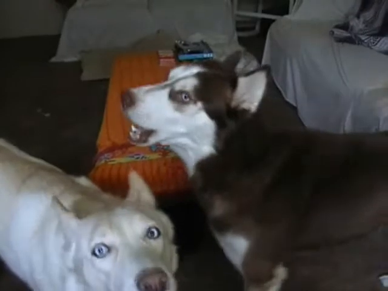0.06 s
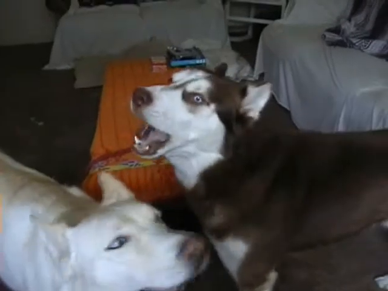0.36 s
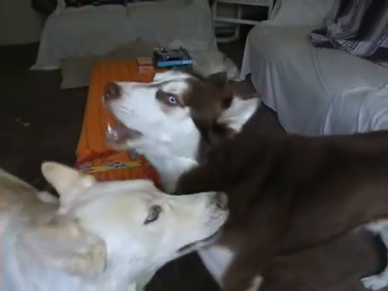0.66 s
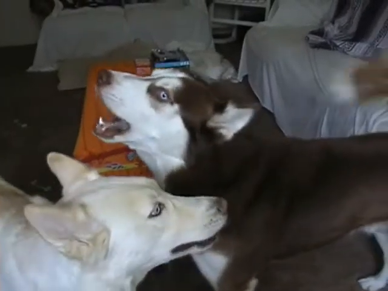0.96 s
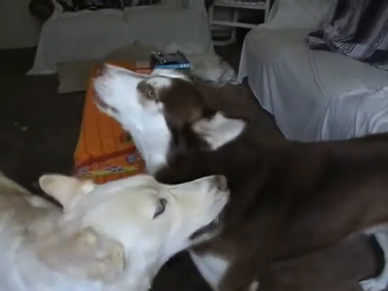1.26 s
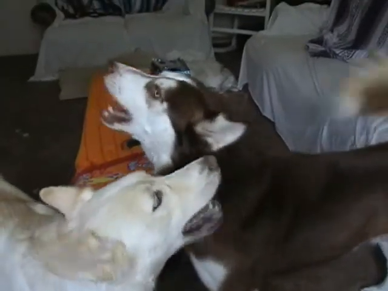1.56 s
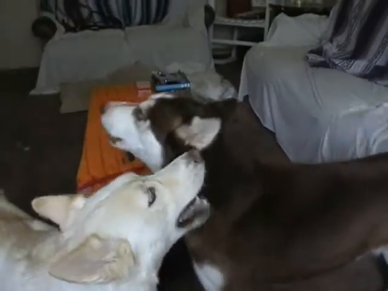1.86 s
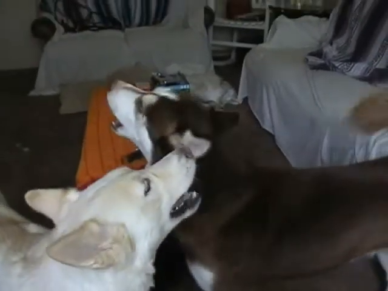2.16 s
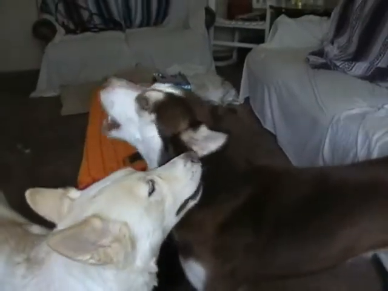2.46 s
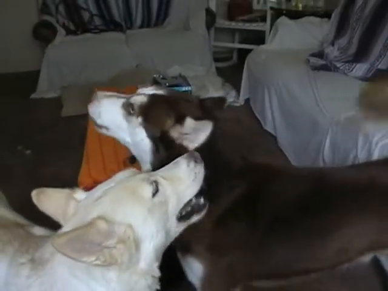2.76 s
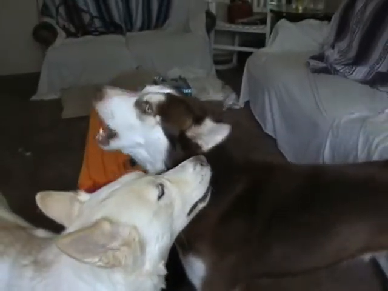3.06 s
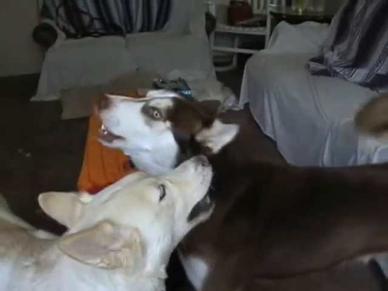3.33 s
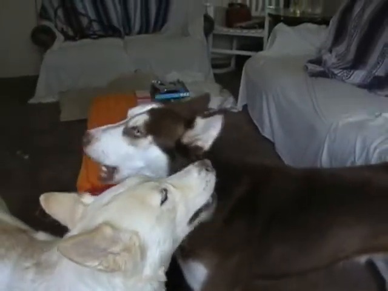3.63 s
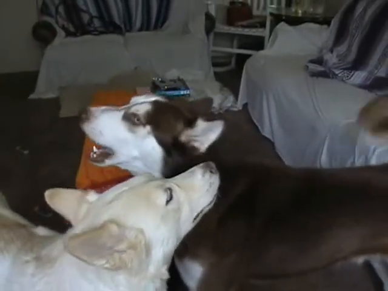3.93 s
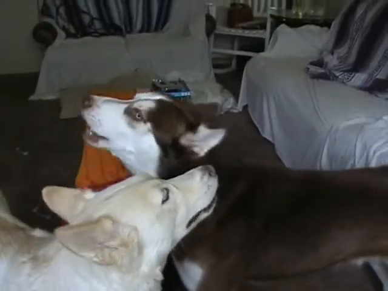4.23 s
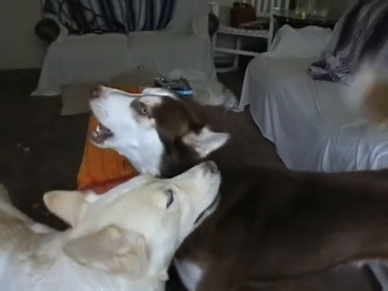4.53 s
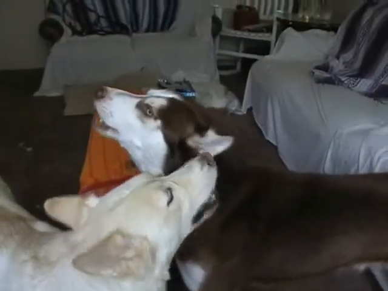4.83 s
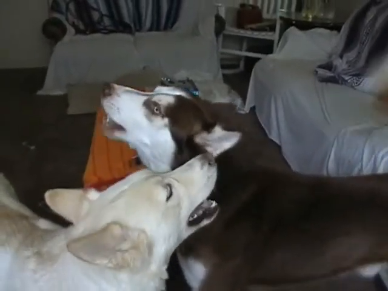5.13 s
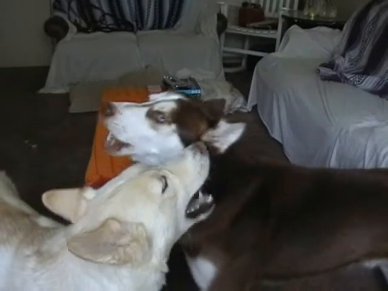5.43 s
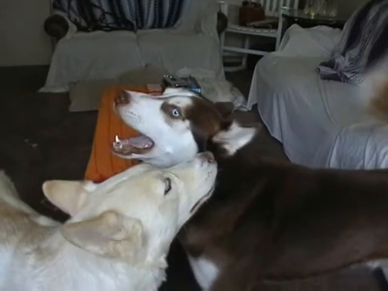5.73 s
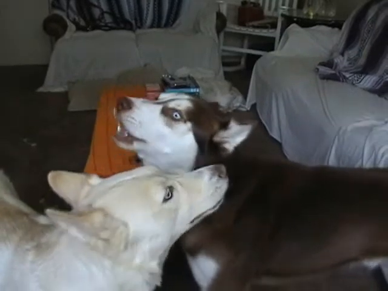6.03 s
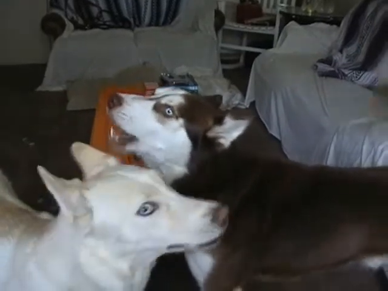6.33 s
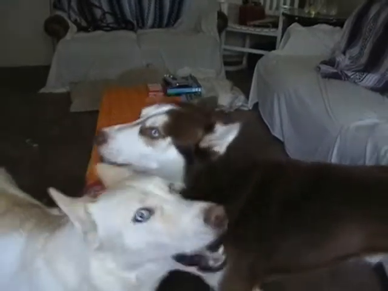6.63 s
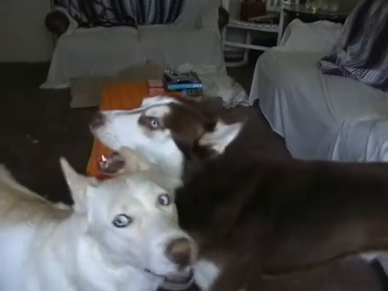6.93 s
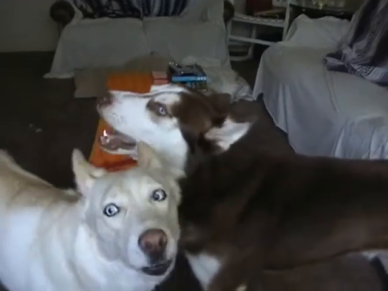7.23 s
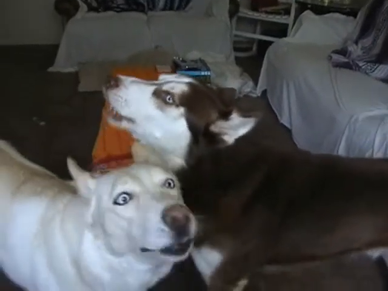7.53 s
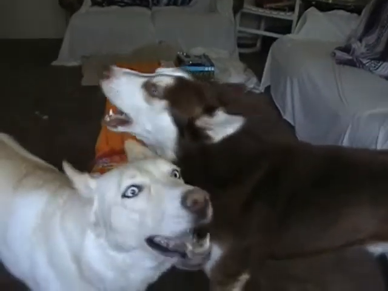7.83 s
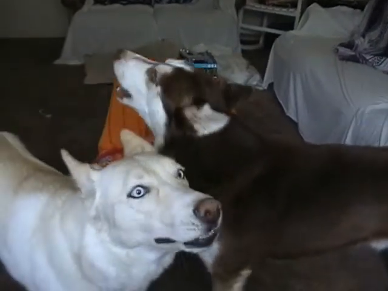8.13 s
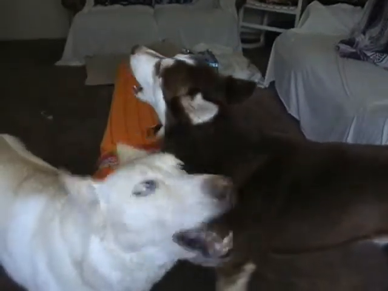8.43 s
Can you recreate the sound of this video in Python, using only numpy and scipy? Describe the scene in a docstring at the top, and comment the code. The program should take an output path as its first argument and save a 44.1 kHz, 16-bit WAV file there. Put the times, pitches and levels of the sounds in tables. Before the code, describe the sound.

One dog holds long, high, wavering howls while another answers with short, rough yowls, close up indoors.

```python
"""Two huskies sing together, close by, in a furnished living room that trails every glide.
From the start, one holds long, clean, flute-like howls; the other answers with lower swooping yowls,
harsh at their loudest. Each voice is a stack of vocal-fold partials shaped by throat and mouth.
At 0.7 s the sound cuts out for an instant. From 1.5 s hoarse gasps fall between calls;
soft bumps join after 3 s, light clicks after 5 s. Both dogs sing on to the end."""
import sys
import numpy as np
from scipy import signal
from scipy.fft import rfft, irfft, next_fast_len
from scipy.io import wavfile
from scipy.ndimage import uniform_filter1d

SR = 44100
rng = np.random.default_rng(int(sys.argv[2]) if len(sys.argv) > 2 else 0)


def pcm_store(signal):
    """Save signal as 16-bit PCM."""
    levels = np.round(np.clip(np.atleast_2d(signal), -1, 1) * 32767)
    wavfile.write(sys.argv[1], SR, levels.astype(np.int16).T)


N = 382788

# Howl curves; the first howl jumps in pitch at the dropout, other steps are register breaks.
# Each row: time in seconds, pitch in Hz, relative level in dB, brightness in dB, mouth resonance in Hz.
HOWL_CURVES = [
    [(0, 919.4, -12, 9, 1550), (0.098, 897.3, -46, 24, 1800), (0.135, 869, -27, -4, 1740),
     (0.186, 866, -24.5, -1, 2480), (0.259, 938, -15, 4, 2760), (0.331, 898, -16.5, -8.5, 2370),
     (0.403, 954, -16, 9, 2560), (0.418, 1054, -16.5, -13, 3100), (0.555, 988, -18, 1, 2870),
     (0.715, 950, -9, -5, 2720)],
    [(0.71, 1100, -16.5, 10.5, 3050), (0.807, 1108, -10, 3, 2790), (0.956, 1029, -16, -1.5, 2170),
     (1.085, 1115, -13, 1, 2454), (1.262, 1025, -21, -4.5, 2120), (1.332, 731, -27, 6, 2050)],
    [(1.637, 615, -19.5, 6.5, 1930), (1.662, 675, -20.5, -5.5, 2030), (1.766, 665, -21.5, -4.5, 1800),
     (1.823, 687.4, -9, -10, 2720), (1.834, 925, -24.5, 1, 2820), (1.873, 953, -22.5, 14, 2550),
     (1.958, 852.6, -27, 2, 2815), (2.113, 933.4, -14.5, 4.5, 2360), (2.125, 1057, -20.5, 8.5, 2720),
     (2.29, 1058, -20.5, -3, 2445), (2.536, 982.5, -19.5, -13, 2644), (2.659, 968.5, -18.5, -1, 1680),
     (2.731, 713, -27.5, 6.5, 1742)],
    [(3.066, 537, -30.5, 12.5, 3140), (3.161, 703, -4, -21.5, 3280), (3.172, 858.7, -20, -0.5, 1760),
     (3.319, 901, -18.5, -2, 2595), (3.485, 868, -17.5, -10.5, 2380), (3.577, 947, -16.5, -3.5, 2750),
     (3.748, 1002, -23, 8.5, 3040), (3.769, 1056, -27.5, -0.5, 2130), (3.952, 1055, -19, 1.5, 2980),
     (4.043, 1126, -17, 3, 2262), (4.257, 1106, -18.5, 6.5, 2330), (4.354, 1040, -12.5, -11, 2793),
     (4.489, 1013, -23, -8, 3000)],
    [(4.49, 877, -23, 8, 1680), (4.545, 980, -23, -0.5, 2195), (4.657, 1127, -14.5, 8, 2366),
     (4.854, 1114, -24, 7, 2335), (4.917, 1015, -22, -9, 3100), (4.932, 818, -21.0, -14, 3050),
     (5.021, 773, -31, -24, 2920)],
    [(5.222, 578.5, -26, -0.5, 1990), (5.265, 637, -14.5, -4.5, 1980), (5.309, 754, -7.5, -2, 2570),
     (5.319, 763, -32, -1.5, 3080), (5.352, 767, -2, -19, 3000), (5.363, 870, -23.0, -17.5, 3200),
     (5.461, 993, -18, -6, 1860), (5.54, 983, -19.5, 4.5, 3050), (5.557, 859, -20, -10, 2394),
     (5.635, 899.4, -19.5, -2, 2770), (5.765, 1085, -10.5, -7, 3120), (5.92, 1116, -14, 2, 2660),
     (6.036, 1067, -19.5, 10.5, 2350), (6.09, 986, -16, -15, 2350), (6.164, 745, -22, -18.5, 2626)],
    [(6.582, 564, -25, -6, 3140), (6.645, 799.6, -9, 0.5, 3090), (6.712, 849.4, -23, 3, 3100),
     (6.804, 809, -28, -1, 2860), (6.875, 900, -16.0, 0, 2590), (6.946, 861.7, -17.5, -5.5, 2280),
     (7.05, 993.7, -15.5, -16, 2670), (7.254, 1028, -22, 10, 3090), (7.34, 1002, -12, -7, 2730),
     (7.352, 1074, -16.0, 8.5, 2530), (7.457, 1032, -20, 0.5, 2450), (7.542, 817.5, -20, 2, 1650)],
    [(7.765, 501.4, -22, -14, 2610), (7.84, 702, -18, 6, 2590), (7.928, 807, -19.5, -11.5, 1880),
     (7.979, 923, -19.5, 0, 2080), (8.045, 967, -18, -1.5, 1940), (8.221, 924.8, -17, -10.5, 2990),
     (8.316, 903.8, -17, 5.5, 2230), (8.466, 870, -22, 1, 2200), (8.693, 958, -22, 4.5, 2680)],
]
# Yowls. Each row: start, rise, hold and tail in seconds, start, top and end pitch in Hz,
# relative onset, main and tail level in dB, brightness in dB, open mouth resonance in Hz,
# share of the climb done at half time, lip rounding from 0 to 1.
YOWL_SWOOPS = [(0,.039,.07,.175,719,910,640.3,-21,-22.5,-12,6.5,1800,.8,0.07),(0.322,0.084,.06,.22,623.4,885,468,-36,-25.5,-37,-0.5,1677,.45,0),
               (1.199,.075,.075,.11,480.3,785,622,-31,-19,-33,-9.5,2250,0.73,.3),(1.498,0.089,.054,.16,608,890,620,-32,-19.5,-34.5,1.5,1608,.5,.5),
               (1.81,0.085,.055,.12,584.4,846,574,-39,-20,-35,-8,2700,0.51,.9),(2.151,0.079,.076,.46,559.5,728,532.6,-35,-26,-31.5,-2,1727,0.76,.8),
               (2.759,.12,.015,.268,547,755.6,483,-29,-18,-24,-15,2080,.6,.85),(3.362,.07,.046,.189,436,755.5,449,-28.5,-23,-38.5,-5.5,2405,.75,.2),
               (3.697,0.072,.061,.13,482.6,817,633,-44,-19.5,-40,-7.5,2820,.75,1),(4.384,.086,.016,0.017,500,802.6,638,-28,-15.5,-40.5,-10.5,2080,0.67,.95),
               (4.75,0.064,.12,.145,585,918.4,660,-35,-25,-33,-5,1767,0.54,0.11),(5.084,0.063,.045,.08,690,839.4,760,-31.5,-22.5,-24.5,-4.5,1683,.5,1),
               (5.421,.075,.071,.18,591,906,556,-34,-28,-37.5,2.5,2080,.5,.7),(5.879,.05,.11,.02,491.4,561,400,-37,-35.5,-50,-8.5,2250,.75,0),
               (6.385,.086,.026,.031,455,702,337.5,-23,-16,-26.5,-2.5,2115,.6,.6),(6.567,0.082,.047,.066,371.5,628,591,-28,-32,-32,3.5,1940,.35,0),
               (6.778,0.061,.016,.16,578,889,521,-42,-24.5,-40,0,1304,.32,.05),(6.989,0.087,.062,.216,531,858,638,-34.5,-24.5,-42,5,1794,.55,.3),
               (7.376,0.075,.066,.029,565,882,740,-43,-25,-28,8,1590,0.64,0.92),(7.744,0.09,.06,.016,603,895,676,-30,-21.5,-24.5,0,1440,.33,.5),
               (8.408,.11,.109,.015,480,917.4,650,-38,-22.5,-46,-1,1440,0.51,0.1)]
# Throat and muzzle colour. Each row: frequency in Hz, relative gain in dB.
HOWL_TRACT = [(450, 38.5), (700, 33.5), (1100, 37.5), (1400, 8.5), (1750, 21.5), (2000, 21.5), (2250, 21),
              (2600, 22.5), (3300, -2), (3900, 3.5), (4650, -13), (5300, 6.5), (6000, -14.5), (6400, -6.5),
              (7300, -7.5), (8100, -6.5), (9300, -20), (11000, -33), (13000, -59.5)]
YOWL_TRACT = [(400, 36), (550, 29), (800, 30.5), (1100, 33.5), (1400, 22.5), (1750, 23), (2000, 22.5),
              (2600, 21.5), (3400, 5.0), (3750, -0.5), (4700, -16), (5350, -3), (5700, -8.5), (6200, 5),
              (7500, -4.0), (8600, -1), (10000, -13.5), (13000, -36), (15500, -50)]
# Noise bursts. Each row: centre in seconds, relative level in dB, half length in seconds.
RASP_BURSTS = [(.07, -43.5, 0.067), (.425, -31, 0.034), (1.27, -32.5, 0.019), (1.597, -37, 0.026),
               (3.14, -36.5, 0.039), (4.45, -42.5, 0.074), (4.828, -35, 0.022), (5.29, -41, 0.054),
               (6.44, -66, 0.019), (6.66, -38.5, .045), (7.097, -24, 0.03), (7.472, -30, 0.043),
               (7.848, -34.5, 0.049), (8.477, -23, 0.035)]
GASP_BURSTS = [(1.49, -34, 0.039), (3.0, -42, 0.044), (5.01, -40.5, 0.022), (5.15, -33.5, 0.044),
               (6.31, -34.5, 0.093), (7.68, -37, .05)]
CLICK_BURSTS = [(5.035, -49.5, 0.0034), (5.08, -42, 0.0021), (5.782, -43.5, .002), (6.28, -58, .002),
                (7.66, -52, 0.0021)]
BUMP_BURSTS = [(3.16, -56, 0.025), (5.37, -45, 0.022), (5.77, -42, 0.043), (7.125, -45, 0.014)]
# Noise colours. Each row: frequency in Hz, relative density in dB.
RASP_SPECTRUM = [(40, -10.5), (170, 4), (330, -1.5), (1200, -9), (4000, -4), (8500, -14.5), (15500, -32.5)]
GASP_SPECTRUM = [(100, -17.5), (250, -4.5), (520, 1), (900, 0.5), (1300, -3), (2600, -19), (5000, -36.5),
                 (9000, -50.5), (13000, -50)]
CLICK_SPECTRUM = [(300, -15.5), (2000, -9), (5500, 1.5), (9000, 5.5), (14000, -16.5)]
BUMP_SPECTRUM = [(30, -16), (110, 4.5), (200, -8), (700, -8), (4000, -45)]
HUSH_SPECTRUM = [(25, -20), (130, -8.5), (350, -10), (1000, -9.5), (3500, -18.5), (8500, -27.5),
                 (11000, -40.5)]
# Room decay. Each row: frequency in Hz, time to fall 60 dB in seconds.
ROOM_T60 = [(300, 0.54), (900, 0.43), (2500, 0.42), (9000, 0.39)]

DROPOUT_START_S, DROPOUT_END_S = 0.708, 0.748
BAND_EDGE_HZ = 15800


def howling_dog():
    """Even vocal-fold cycles give long, clean tones."""
    return voice(HOWL_CURVES, HOWL_TRACT, coarse=np.zeros(N), jitter=0.003, shimmer=0.099, drift_hz=55,
                 flutter_db=6.5, flutter_hz=32, attack_s=0.0037, thin_db=-3, push_db=-0.5)


def yowling_dog():
    """Lower swoops; the sound turns coarse and distorted at each rasp."""
    curves = [swoop(*row) for row in YOWL_SWOOPS]
    return voice(curves, YOWL_TRACT, coarse=22 * swells(RASP_BURSTS), jitter=0.0029, shimmer=0.22,
                 drift_hz=83.5, flutter_db=8, flutter_hz=44.46, attack_s=0.012, thin_db=-4, push_db=3.5)


def swoop(start_s, rise_s, hold_s, tail_s, start_hz, top_hz, end_hz, onset_db, level_db, tail_db,
          bright_db, mouth_hz, half_risen, rounding, break_s=0.042):
    """One yowl curve: climbs as the mouth opens, holds as the lips round, breaks, sags as it closes."""
    moan_s = start_s + rise_s + hold_s + break_s
    moan_hz = 0.8 * top_hz  # about a major third down
    rounded_hz = mouth_hz + rounding * (top_hz - mouth_hz)
    dull = (bright_db - 8, 0.69 * mouth_hz)
    return [(start_s, start_hz, onset_db, bright_db - 9, 0.67 * mouth_hz),
            (start_s + rise_s / 2, start_hz + half_risen * (top_hz - start_hz),
             level_db, bright_db, mouth_hz),
            (start_s + rise_s, 0.98 * top_hz, level_db, bright_db, mouth_hz),
            (start_s + rise_s + hold_s, top_hz, level_db, bright_db - 7.5, rounded_hz),
            (moan_s, moan_hz, tail_db, *dull),
            (moan_s + tail_s / 2, moan_hz + 0.7 * (end_hz - moan_hz), tail_db, *dull),
            (moan_s + tail_s, end_hz, tail_db - 9.5, *dull)]


def voice(curves, tract, coarse, jitter, shimmer, drift_hz, flutter_db, flutter_hz, attack_s,
          thin_db, push_db, mouth_db=12.5, mouth_width_hz=148, full_climb_per_s=4.3, release_s=0.0021):
    """Vocal-fold partials on one unsteady pitch slide through the throat and mouth resonances."""
    out = np.zeros(N)
    peak_db = max(db for _, db in tract)
    for rows in curves:
        times_s, *columns = np.transpose(rows)
        t = np.arange(times_s[0], times_s[-1], 1 / SR)
        pitch_hz, level_db, bright_db, mouth_hz = (
            uniform_filter1d(np.interp(t, times_s, column), 300, mode="nearest") for column in columns)
        phase = 2 * np.pi * np.cumsum(pitch_hz * (1 + jitter * wander(len(t), drift_hz))) / SR
        knots_s = np.arange(times_s[0], times_s[-1] + 1, 1 / flutter_hz)
        # A climbing voice is pressed: the fundamental thins against the second partial.
        climb_per_s = uniform_filter1d(np.gradient(np.log(pitch_hz)), 900) * SR
        pressed = np.clip(climb_per_s / full_climb_per_s, 0, 1)
        partials = []
        for k in range(1, 22):
            hz = k * pitch_hz
            db = level_db + at_hz(tract, hz) - peak_db
            db += bright_db * min((k - 1) / 3.5, 1)
            db += mouth_db / (1 + ((hz - mouth_hz) / mouth_width_hz) ** 2)
            db += pressed * (thin_db * (k == 1) + push_db * (k == 2))
            db += flutter_db * (1 - 1 / k) * np.interp(t, knots_s, rng.standard_normal(len(knots_s)))
            wave = np.sin(k * phase + 2 * np.pi * rng.random())
            partials.append(gain(db) * (hz < BAND_EDGE_HZ) * wave)
        # Alternating strong and weak cycles put coarse lines halfway between the upper partials.
        alternation = np.cos(phase / 2) + 0.5 * wander(len(t), 200)
        uneven = np.interp(t * SR, np.arange(N), coarse) * alternation
        tone = partials[0] + (1 + uneven) * sum(partials[1:])
        fade = np.clip(np.minimum((t - t[0]) / attack_s, (t[-1] - t) / release_s), 0, 1)
        add(out, times_s[0], np.sqrt(2) * tone * fade * (1 + shimmer * wander(len(t), drift_hz)))
    return out


def rasp(yowl, depth=0.15, grain_db=4):
    """Gritty bursts on the loudest swoops, chopped by the cycles of the voice."""
    cycle = np.cos(np.angle(signal.hilbert(yowl, next_fast_len(N))[:N]))
    chopped = noise(RASP_SPECTRUM) * (1 + depth * cycle)
    return swells(RASP_BURSTS) * unit_rms(chopped * gain(grain_db * wander(N, 200)))


def gasps(grain_db=4):
    """Air rattles through a dog's throat between calls."""
    return swells(GASP_BURSTS) * unit_rms(noise(GASP_SPECTRUM) * gain(grain_db * wander(N, 120)))


def clicks():
    """Light clicks, perhaps of claws or teeth."""
    return swells(CLICK_BURSTS) * noise(CLICK_SPECTRUM)


def bumps():
    """Soft, low bumps."""
    return swells(BUMP_BURSTS) * noise(BUMP_SPECTRUM)


def room(x, first_s=0.006):
    """Dense reflections of random sign, each band dying at its own rate."""
    taps = rng.standard_normal(SR) * (rng.random(SR) < 0.1) * (np.arange(SR) > first_s * SR)
    hz, t, bands = signal.stft(taps, SR, nperseg=256)
    decay = gain(-60 * t / at_hz(ROOM_T60, hz)[:, None])
    _, tail = signal.istft(bands * decay, SR, nperseg=256)
    tail /= np.linalg.norm(tail)
    # The sound skips ahead at the dropout; no tail carries across.
    early = np.arange(N) < DROPOUT_END_S * SR
    return sum(part * signal.fftconvolve(x * part, tail)[:N] for part in (early, ~early))


def hush(level_db=-51):
    """Still-room noise, mostly shared by both channels."""
    shared, left, right = (noise(HUSH_SPECTRUM) for _ in range(3))
    return gain(level_db) * (shared + 0.43 * np.array([left, right]))


def ports(mid, lateral, corner_hz=4500):
    """Two close microphone ports: sound from the sides differs between them, more so in the treble."""
    hz = np.fft.rfftfreq(N, 1 / SR)
    side = irfft(rfft(lateral) * (hz + 250) / np.hypot(hz, corner_hz), N)
    return np.array([mid + side, mid - side])


def swells(bursts):
    """One Gaussian rise and fall per row."""
    t = np.arange(N) / SR
    return sum(gain(db) * np.exp(-((t - centre_s) / half_s) ** 2) for centre_s, db, half_s in bursts)


def noise(spectrum):
    """Steady coloured noise, rms 1."""
    colour = gain(at_hz(spectrum, np.fft.rfftfreq(N, 1 / SR)))
    return unit_rms(irfft(rfft(rng.standard_normal(N)) * colour, N))


def wander(size, corner_hz):
    """Low-passed random drift, rms 1."""
    padded = next_fast_len(size)
    hz = np.fft.rfftfreq(padded, 1 / SR)
    spectrum = rfft(rng.standard_normal(padded)) / (1 + (hz / corner_hz) ** 4)
    return unit_rms(irfft(spectrum, padded)[:size])


def at_hz(table, hz):
    """Table lookup on a log-frequency axis."""
    table_hz, values = np.transpose(table)
    return np.interp(np.log(hz + 1), np.log(table_hz), values)


def add(mix, start_s, sound):
    """Mixes a sound in, in place."""
    part = mix[max(round(start_s * SR), 0):][:len(sound)]
    part += sound[:len(part)]


def gain(db):
    """Decibels to amplitude."""
    return 10 ** (np.asarray(db) / 20)


def unit_rms(x):
    """Scales to rms 1."""
    return x / np.sqrt(np.mean(x ** 2) + 1e-20)


def scene():
    """Both dogs, their small noises, the room's reflections and its hush, in stereo."""
    howl = howling_dog()
    yowl = yowling_dog()
    grit = rasp(yowl)
    small_noises = gasps() + clicks()
    direct = gain(3.49) * howl + gain(5) * yowl + grit + small_noises
    to_walls = gain(-3) * howl + gain(-1.5) * (yowl + small_noises) + gain(-23.5) * grit
    mid = direct + room(to_walls) + bumps()
    lateral = room(gain(-2.5) * howl + gain(-1) * yowl) + gain(-6.5) * rasp(yowl)
    return ports(mid, lateral) + hush()


def record(dry, limit_db=-12, recovery_db_per_s=220, dropout_db=-49.5):
    """Limiter on the loudest tones, one dropout, then the band limit."""
    t = np.arange(N) / SR
    power_db = 10 * np.log10(abs(uniform_filter1d((dry ** 2).mean(0), 400)) + 1e-12)
    recovery_db = recovery_db_per_s * t
    held_db = np.maximum.accumulate(power_db + recovery_db) - recovery_db
    over_db = np.maximum(held_db - limit_db, 0)
    limited = dry / gain(uniform_filter1d(over_db, 200))
    dropout = np.where((t > DROPOUT_START_S) & (t < DROPOUT_END_S), gain(dropout_db), 1)
    lowpass = signal.firwin(511, BAND_EDGE_HZ, window=("kaiser", 9), fs=SR)
    return signal.oaconvolve(limited * dropout, lowpass[None], "same")


dry = scene()
out = record(dry)
pcm_store(out)
```